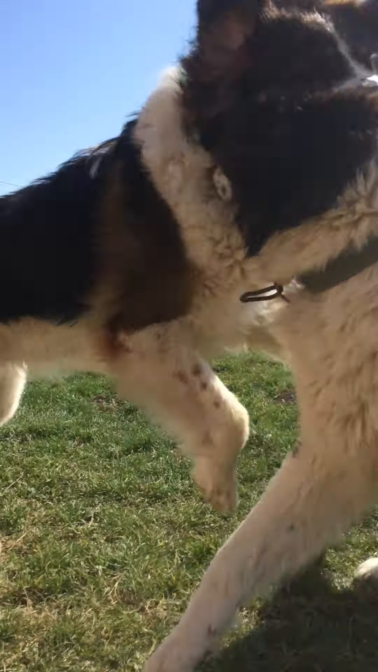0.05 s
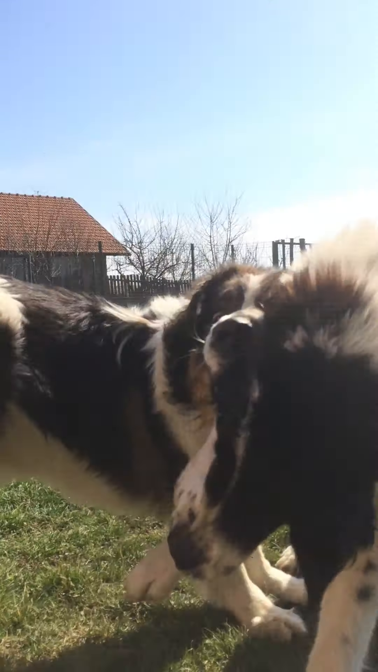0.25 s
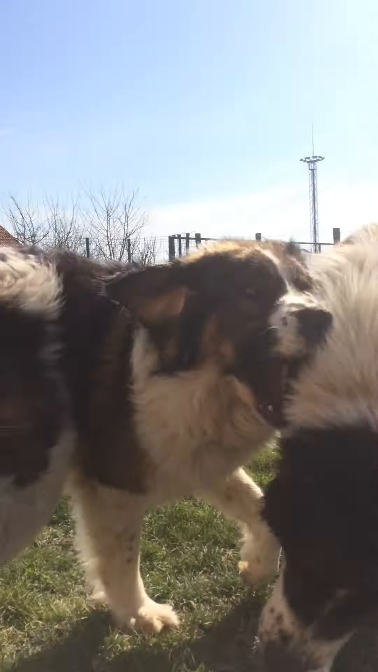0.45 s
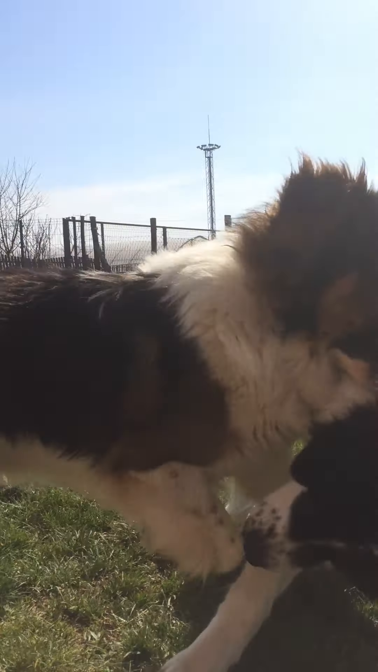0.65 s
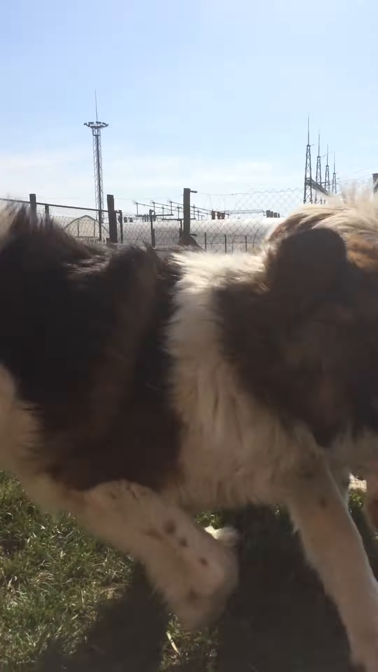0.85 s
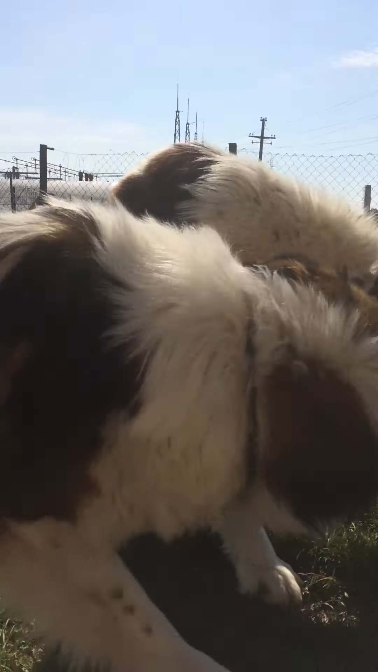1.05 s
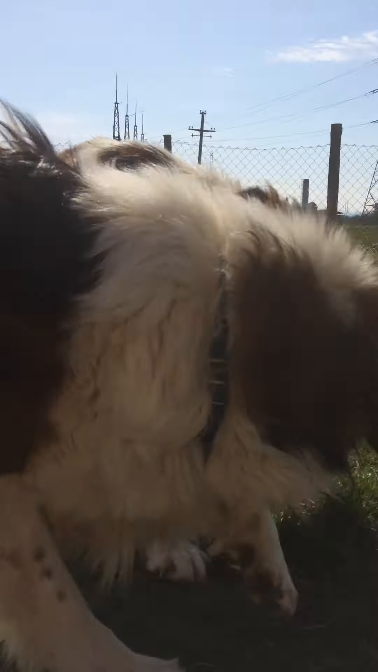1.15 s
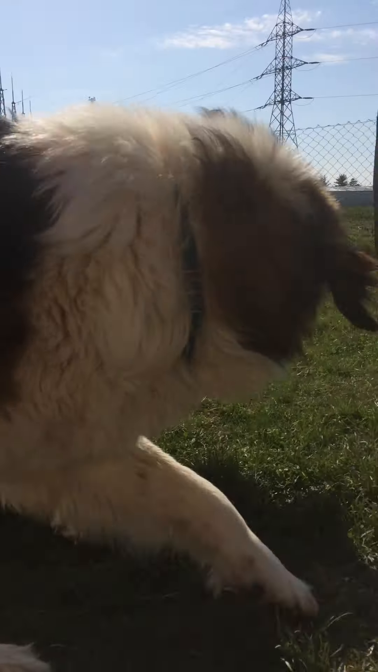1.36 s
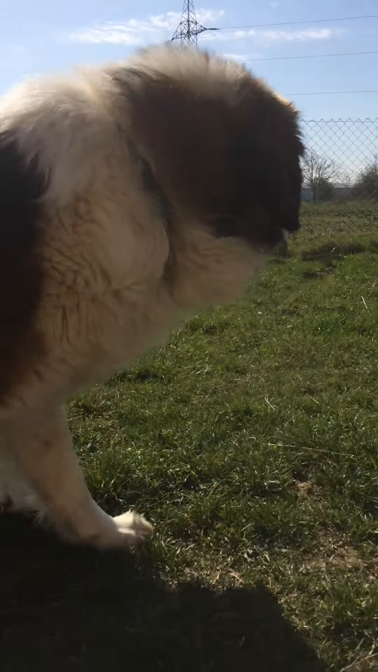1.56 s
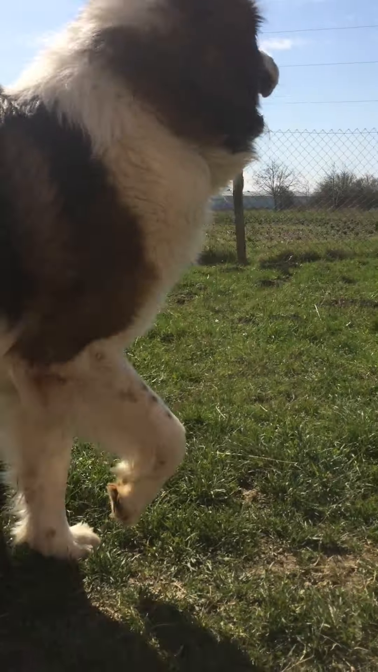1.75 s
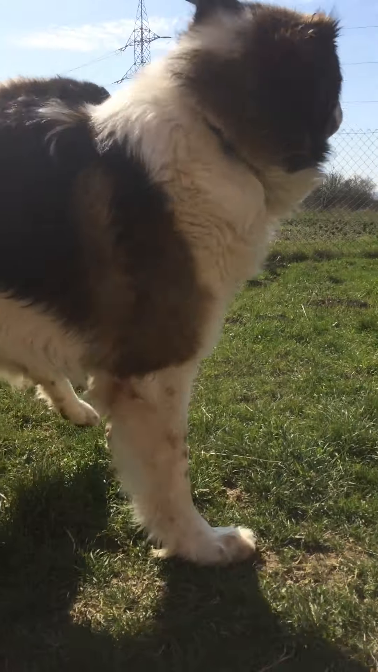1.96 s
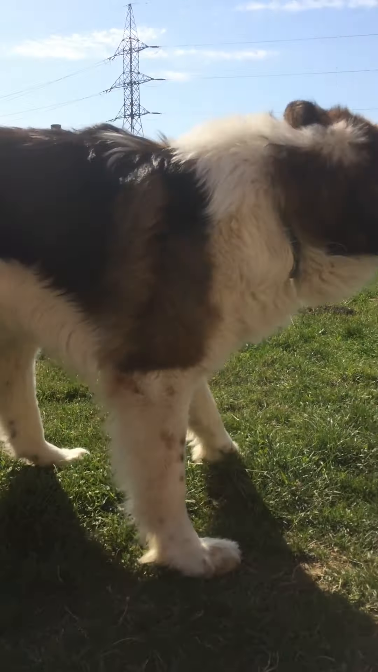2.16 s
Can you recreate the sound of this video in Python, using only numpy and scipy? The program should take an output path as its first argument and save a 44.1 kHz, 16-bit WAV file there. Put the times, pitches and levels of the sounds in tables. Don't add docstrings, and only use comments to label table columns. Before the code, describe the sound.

A large dog growls close to a phone microphone on an open lawn. Paw taps first, a bright collar chink at 0.2 s, then a low growl rising into a wet, hard snarl around 0.45 s with grass scuffs. A shorter growl returns at 0.65-0.8 s. Faint whines at 0.8 and 1.3 s, pants near 1.2 and 1.7 s, taps thinning until 2.2 s over faint low hum.

```python
import sys
import numpy as np
from scipy import signal
from scipy.fft import rfft, irfft
from scipy.io import wavfile
from scipy.ndimage import uniform_filter1d

SR = 44100
rng = np.random.default_rng(int(sys.argv[2]) if len(sys.argv) > 2 else 0)


def convert_level_to_amplitude(level_db):
    exponent = np.asarray(level_db, float) / 20
    return 10 ** exponent


def master_out(mix):
    frames = np.transpose(np.atleast_2d(mix))
    ceiling = np.clip(frames, -1, 1)
    pcm = np.round(ceiling * 32767).astype(np.int16)
    wavfile.write(sys.argv[1], SR, pcm)


N = 97020


def evened(x):
    return x / np.sqrt(np.mean(x ** 2) + 1e-20)


def add(mix, start, sound):
    part = mix[max(round(start * SR), 0):][:len(sound)]
    part += sound[:len(part)]


def resonate(x, hz, width):
    turn = np.exp(2j * np.pi * np.cumsum(hz * np.ones(len(x))) / SR)
    decay = np.exp(-np.pi * width / SR)
    smooth = signal.lfilter([1 - decay], [1, -decay], x / turn + 1e-18)
    return 2 * (turn * smooth).real


def wander(count, per_s):
    size = max(int(SR / per_s), 1)
    noise = rng.standard_normal(max(count, 20000))
    return evened(uniform_filter1d(uniform_filter1d(noise, size), size))[:count]


def coloured(x, points):
    table_hz, db = np.transpose(points)
    hz = np.fft.rfftfreq(len(x), 1 / SR)
    gain = convert_level_to_amplitude(np.interp(np.log(hz + 1), np.log(table_hz), db))
    return evened(irfft(rfft(x) * gain, len(x)))


def yard():
    # (frequency [Hz], density [dB per Hz])
    air_spectrum = [(15, -42), (25, -7), (102, 1), (229, -16.5), (659, -17.5), (1230, -22.5), (1440, -64),
                    (9570, -55), (16000, -25.5)]
    hum_hz, hum_db, hum_waver_db = 100, -52, -1.5
    rumble_hz, rumble_width_hz, rumble_db, rumble_lump_db = 75, 78, -62.5, 3
    air_db, fade_db_per_s = -58.5, -3
    t = np.arange(N) / SR
    hum = convert_level_to_amplitude(hum_db + hum_waver_db * wander(N, 1.8)) * np.sin(2 * np.pi * hum_hz * t)
    low = resonate(resonate(rng.standard_normal(N), rumble_hz, rumble_width_hz), rumble_hz, 140)
    rumble = convert_level_to_amplitude(rumble_db + rumble_lump_db * wander(N, 4.35)) * evened(low)
    air = convert_level_to_amplitude(air_db + 2.8 * wander(N, 6.4)) * coloured(rng.standard_normal(N), air_spectrum)
    return (hum + rumble + air) * convert_level_to_amplitude(fade_db_per_s * (t - N / SR / 2))


def grass():
    # (time [s], level [dB])
    scuffs = [(0, -66), (0.242, -63), (0.256, -48), (.28, -60), (.42, -58), (0.453, -46), (0.511, -45),
              (0.568, -62), (.71, -55.5), (0.861, -59.5), (1.0, -58.5), (1.038, -50), (1.12, -59.5),
              (1.169, -63.5), (1.642, -64.5), (1.703, -54.5), (1.821, -71.5), (2.2, -66.5)]
    # (frequency [Hz], density [dB per Hz])
    blades = [(200, -28), (500, -5), (2500, -8), (5000, -11), (13500, -11.5), (16000, -18)]
    snaps_per_s, snap_db, crackle_share = 2500, -1, 0.46
    s, db = np.transpose(scuffs)
    snaps = (rng.random(N) < snaps_per_s / SR) * convert_level_to_amplitude(snap_db * np.minimum(rng.exponential(1, N), 4))
    crackle = np.convolve(snaps, np.exp(-np.arange(100) / 20))[:N] * rng.standard_normal(N)
    rustle = crackle_share * evened(crackle) + (1 - crackle_share) * rng.standard_normal(N)
    level_db = np.interp(np.arange(N) / SR, s, db) + 4.0 + 2.7 * wander(N, 83.0)
    return convert_level_to_amplitude(level_db) * coloured(rustle, blades)


def tap(start, db, hz):
    cycles, puff_db = 3.5, -5
    t = np.arange(2000) / SR
    noise = evened(resonate(rng.standard_normal(2000), hz, 0.57 * hz))
    puff = convert_level_to_amplitude(puff_db) * np.exp(-t / 0.005) * noise
    thud = np.sin(2 * np.pi * hz * t) * np.exp(-t / (0.0027 + cycles / hz / 4))
    return start, convert_level_to_amplitude(db) * (thud + puff)


def ring(modes, t):
    onset = 1 - np.exp(-t / 0.00081)
    total = np.zeros(len(t))
    for k, (hz, db, t60) in enumerate(modes):
        total += (-1) ** k * convert_level_to_amplitude(db - 60 * t / t60) * onset * np.sin(2 * np.pi * hz * t)
    return total


def chink(start, db, low_db):
    # (frequency [Hz], level [dB], t60 [s])
    tag_modes = [(13690, 0, .036), (13880, -2, .03), (14110, -8, .02), (13450, -10, .02)]
    # (frequency [Hz], level [dB], t60 [s])
    buckle_modes = [(7260, -3, 0.039), (7640, -16, 0.053), (2655, -17, 0.02), (9800, 1, 0.007),
                    (10200, -5, 0.0036), (8900, -11, 0.0089)]
    tick_db, tick_s = 0.0, 0.0026
    t = np.arange(4000) / SR
    tick = convert_level_to_amplitude(tick_db) * np.exp(-t / tick_s) * np.diff(rng.standard_normal(4001))
    low = convert_level_to_amplitude(low_db) * (ring(buckle_modes, t) + tick)
    return start, convert_level_to_amplitude(db) * 0.75 * (ring(tag_modes, t) + low)


def whine(start, length, db, hz):
    u = np.arange(0, length, 1 / SR) / length
    tone = np.sin(2 * np.pi * np.cumsum(hz * (1 + 0.026 * (u - 0.7))) / SR)
    return start, convert_level_to_amplitude(db) * u ** 0.92 * np.minimum((1 - u) / 0.16, 1) * tone


def wheeze(start, length, db, from_hz, to_hz):
    flutter_db, edge_power = 2, 0.77
    u = np.arange(0, length, 1 / SR) / length
    hz = from_hz + (to_hz - from_hz) * u
    width = 70 + 0.065 * from_hz
    air = rng.standard_normal(len(u)) * convert_level_to_amplitude(flutter_db * wander(len(u), 120))
    gap = evened(resonate(resonate(air, hz, width), hz, 2 * width))
    return start, convert_level_to_amplitude(db) * np.sin(np.pi * u) ** edge_power * gap


def pant(start, length, db, first_hz, peak_at):
    # (frequency [Hz], width [Hz], level [dB])
    throat = [(380, 220, -10), (1480, 1190, -5.5), (2600, 540, -25.5), (3750, 1400, -19.5),
              (4930, 2300, -35)]
    flutter_db, wobble_hz = 1.5, 35.5
    second_ratio, second_top_hz, second_db = 1.7, 2300, -14.5
    bright_power, bright_per_db = 0.8, 0.03
    t = np.arange(0, length, 1 / SR)
    air = rng.standard_normal(len(t)) * convert_level_to_amplitude(flutter_db * wander(len(t), 250))
    one = first_hz + wobble_hz * wander(len(t), 26.0)
    two = min(first_hz * second_ratio, second_top_hz) + wobble_hz * wander(len(t), 26.0)
    low = evened(resonate(resonate(air, one, 182), one, 890))
    high = evened(resonate(resonate(air, two, 300), two, 930))
    skew = np.log(0.5) / np.log(np.clip(peak_at, 0.1, 0.9))
    shape = np.sin(np.pi * (t / length) ** skew) ** 1.74
    bright = shape ** bright_power * convert_level_to_amplitude(bright_per_db * (db + 34))
    rest = np.zeros(len(t))
    for hz, width, throat_db in throat:
        opening = bright if hz > 2000 else 1
        rest += convert_level_to_amplitude(throat_db) * opening * evened(resonate(resonate(air, hz, width), hz, 2 * width))
    return start, convert_level_to_amplitude(db) * shape * evened(low + convert_level_to_amplitude(second_db) * high + rest)


def snarl(start, length, db, first_hz, peak_at):
    second_ratio, second_top_hz, second_db, air_db = 1.98, 2500, -1, -0.5
    air = pant(start, length, db, first_hz, peak_at)[1] * convert_level_to_amplitude(air_db - db)
    t = np.arange(len(air)) / SR
    second_hz = min(second_ratio * first_hz, second_top_hz)
    mouth = np.sin(2 * np.pi * first_hz * t) + convert_level_to_amplitude(second_db) * np.sin(2 * np.pi * second_hz * t)
    return start, convert_level_to_amplitude(db) * (air + 1.06 * np.sin(np.pi * t / length) ** 0.88 * mouth)


def growl(rows):
    chest_width_hz, mouth_width_hz, jitter, shimmer_db = 120, 170, 0.1, 1.5
    s, chest_db, fold_hz, mouth_db, mouth_hz, rough = np.transpose(rows)
    t = np.arange(s[0], s[-1], 1 / SR)
    rough = np.clip(np.interp(t, s, rough), 0, 1)
    rate = np.interp(t, s, fold_hz) * (1 + jitter * rough * wander(len(t), 67))
    turns = np.cumsum(rate) / SR
    slaps = np.diff(np.floor(turns), prepend=0) * convert_level_to_amplitude(shimmer_db * wander(len(t), 180))
    puffs = (0.89 + np.exp(-(turns % 1))) * rng.standard_normal(len(t))
    drive = (1 - rough) * evened(slaps) + rough * evened(puffs)
    mouth_now = np.interp(t, s, mouth_hz)
    mouth = resonate(drive, mouth_now, mouth_width_hz)
    mouth = evened(resonate(resonate(mouth, mouth_now, 420), mouth_now, 664))
    tone = np.sin(2 * np.pi * turns) + 0.09 * np.cos(4 * np.pi * turns + 1)
    rasp = evened(resonate(resonate(puffs, 90.0, chest_width_hz), 86.0, 220))
    chest = evened(tone + 0.55 * rough * rasp)
    edge = np.clip(np.minimum(t - s[0], s[-1] - t) / 0.0047, 0, 1)
    voice = convert_level_to_amplitude(np.interp(t, s, chest_db)) * chest + convert_level_to_amplitude(np.interp(t, s, mouth_db)) * mouth
    return s[0], edge * voice


def scene():
    # (time [s], peak level [dB], pitch [Hz])
    paw_taps = [(.002, -37, 100), (.01, -38.5, 397), (.135, -44, 4640), (0.149, -51.5, 308),
                (.574, -68, 12000), (.600, -42, 2400), (.666, -43, 900), (.6955, -29, 950),
                (0.876, -40.5, 210), (1.015, -43.5, 194), (1.068, -37.5, 75), (1.082, -40.5, 1270),
                (1.109, -42.5, 171.7), (1.324, -49, 8235), (1.386, -46, 390), (1.386, -56, 3000),
                (1.511, -43.5, 155), (1.678, -42, 1130), (1.749, -46, 191), (1.8, -50, 684),
                (1.823, -53, 680), (1.98, -55.5, 2600), (2.019, -48.5, 750), (2.032, -58, 1300),
                (2.117, -65, 4950), (2.12, -56, 9690)]
    # (time [s], peak level [dB], buckle level [dB])
    collar_chinks = [(0.014, -47, -5), (0.1986, -20, -3), (0.2054, -17.5, -7), (0.257, -30, -6),
                     (0.7149, -45, -16.5), (.798, -56.5, -20), (.929, -38, -10), (.97, -38, -11),
                     (1.273, -33, -13), (1.533, -45.5, -0.5), (1.98, -50, 0), (2.069, -49, -6)]
    # (start [s], length [s], level [dB], pitch [Hz])
    thin_whines = [
        (0.822, 0.126, -53.5, 1087),
        (1.275, 0.11, -53, 1100),
    ]
    # (start [s], length [s], level [dB], from [Hz],
    # to [Hz])
    gliding_bands = [(0.038, 0.1, -64, 420, 330), (0.293, 0.025, -29, 385, 427),
                     (0.307, 0.017, -43.5, 1220, 1320), (0.309, 0.035, -45, 1750, 1800),
                     (0.333, 0.041, -40.5, 1250, 1400), (0.334, 0.059, -42.5, 2110, 1960),
                     (0.339, 0.048, -40.5, 1720, 1610), (0.344, 0.065, -51.5, 2400, 2320),
                     (.34, 0.074, -47, 860, 900), (.385, 0.06, -40.5, 1600, 1880),
                     (0.401, 0.098, -38.5, 2010, 3020), (0.416, 0.053, -33.5, 1145, 1320),
                     (0.591, 0.068, -54.5, 328, 300), (.694, 0.025, -33.5, 950, 1020),
                     (0.713, 0.014, -37.5, 1710, 1660), (0.703, 0.034, -45, 3560, 3500),
                     (0.725, 0.016, -36.5, 790, 740), (.73, 0.028, -49, 3170, 3270),
                     (0.754, 0.053, -48.5, 3750, 4080), (0.767, 0.055, -51, 2370, 2600),
                     (0.778, 0.024, -44, 560, 500), (1.165, 0.048, -52.5, 900, 970),
                     (1.2, .055, -40.5, 1006, 1044), (1.196, .12, -55.5, 610, 590),
                     (1.209, 0.073, -57.5, 3300, 3740), (1.314, 0.026, -50.5, 1150, 1090),
                     (1.48, 0.094, -56.5, 2490, 2330), (1.55, 0.085, -63.5, 2280, 2450),
                     (1.67, .05, -46, 1800, 1700), (1.675, 0.093, -56, 2500, 2320),
                     (1.671, 0.071, -54, 4540, 4860), (1.675, .1, -51, 198, 180),
                     (2.037, 0.058, -67.5, 910, 1230), (.26, 0.078, -37.5, 146, 165),
                     (.41, .06, -41, 150, 157), (0.304, 0.082, -56, 4100, 4440),
                     (2.114, 0.14, -53.5, 760, 730), (2.114, 0.089, -53, 1200, 1110),
                     (1.22, 0.052, -54.5, 169, 169), (0.684, 0.047, -51, 5170, 4950)]
    # (start [s], length [s], level [dB], first resonance [Hz], place of the peak [0-1])
    breaths = [(0.0, 0.04, -44.5, 720, 0.3), (0.304, 0.19, -45, 1263, 0.26),
               (0.412, 0.11, -26.5, 687, 0.46), (0.653, 0.12, -33.5, 965, 0.48),
               (0.749, 0.077, -40.5, 985, 0.21), (0.959, 0.24, -56, 930, 0.43),
               (1.162, 0.2, -41, 1067, 0.44), (1.474, 0.2, -64, 1300, 0.35),
               (1.655, 0.18, -44.5, 718, 0.21), (1.645, 0.18, -47.5, 1096, 0.4),
               (1.663, 0.14, -53, 3640, 0.33), (1.849, 0.082, -70, 738, 0.27),
               (2.017, 0.069, -61, 997, 0.82), (2.115, 0.2, -59, 452, 0.37),
               (2.116, 0.11, -55.5, 1150, 0.2), (.33, .12, -50, 850, 0.54)]
    # (start [s], length [s], level [dB], first resonance [Hz], place of the peak [0-1])
    bursts = [(0.445, 0.0068, -22, 705, 0.61), (.460, 0.01364, -18, 671.7, 0),
              (.463, 0.0086, -30.5, 2752, 0.6), (0.477, 0.013, -19.5, 709, 0.28),
              (0.494, 0.011, -27.5, 750, 0.55), (0.697, 0.006, -35.5, 885, 0.92),
              (0.759, 0.0086, -36, 2345, .4)]
    # (time [s], chest level [dB], fold rate [Hz], mouth level [dB],
    # mouth resonance [Hz], roughness [0-1])
    phrases = [
        [(.2195, -42.5, 68, -52, 444, .3), (.253, -37, 67.66, -39.5, 460, 0.26),
         (.282, -30, 67.94, -38, 417, .15), (.31, -30, 84.8, -32.5, 374, 0.17),
         (.325, -41, 107.3, -42.5, 410, 0.78), (.36, -43, 110.5, -35.5, 474, 0.86),
         (.385, -29.5, 120.1, -45.5, 447, 0.84), (.43, -44.5, 120, -33, 596, 0.7)],
        [(.43, -30, 124.4, -38, 630, 1.1), (.46, -39.5, 110.5, -38, 704, 0.8),
         (.5, -26.5, 95.7, -36.5, 634, 0.9), (.53, -26, 91.1, -40, 620, 0.3), (.57, -31, 86.2, -46.5, 403, 0.7),
         (.595, -46, 82.4, -50.5, 366, .9), (.65, -46, 85, -61.5, 380, 1.2)],
        [(.65, -46, 91.4, -55, 512, 1.1), (.678, -34.5, 93.4, -45, 517, 0.88),
         (.698, -34, 93.8, -40.5, 528, .8), (.77, -43, 90.06, -49, 520, 0.8), (.8, -69, 89, -48.5, 500, 0.9),
         (.83, -72, 86, -82, 443, 0.93)],
    ]
    mix = yard() + grass()
    for source, table in ((tap, paw_taps), (chink, collar_chinks), (whine, thin_whines),
                          (wheeze, gliding_bands), (pant, breaths), (snarl, bursts)):
        for row in table:
            add(mix, *source(*row))
    for rows in phrases:
        add(mix, *growl(rows))
    return mix[None]


def band_limit(x):
    return signal.sosfilt(signal.butter(12, 16970, fs=SR, output="sos"), x)


def record(dry):
    bass_cut_hz, band_limit_hz = 38, 15750
    thin = signal.sosfilt(signal.butter(2, bass_cut_hz, "high", fs=SR, output="sos"), dry)
    limit = signal.firwin(401, band_limit_hz, window=("kaiser", 8), fs=SR)
    dull = signal.oaconvolve(thin, limit[None], "same")
    return band_limit(dull)


dry = scene()
out = record(dry)
master_out(out)
```